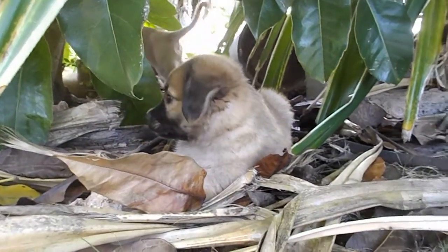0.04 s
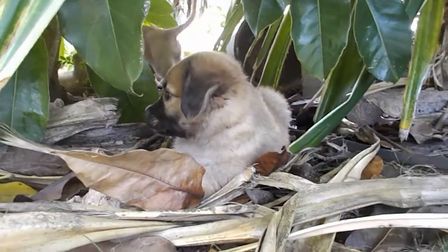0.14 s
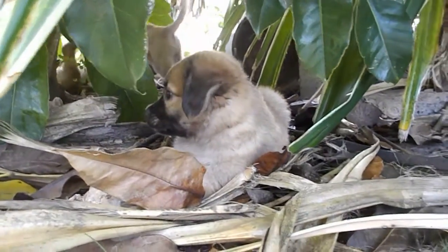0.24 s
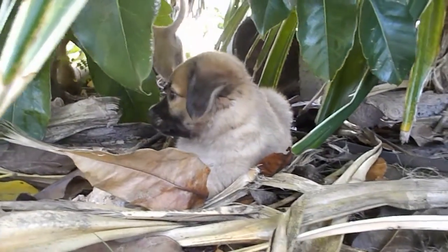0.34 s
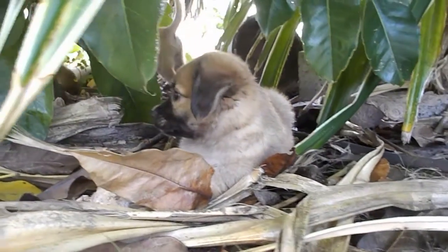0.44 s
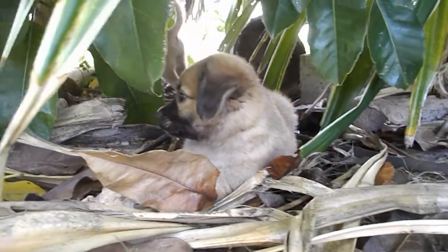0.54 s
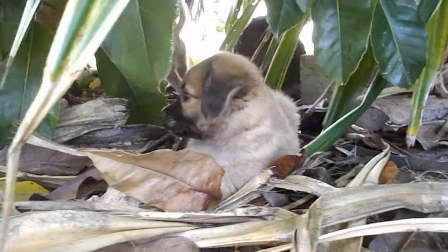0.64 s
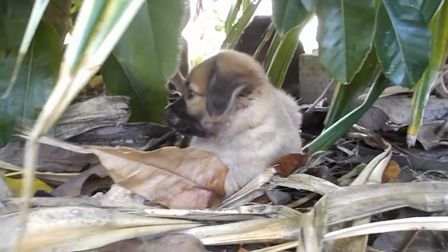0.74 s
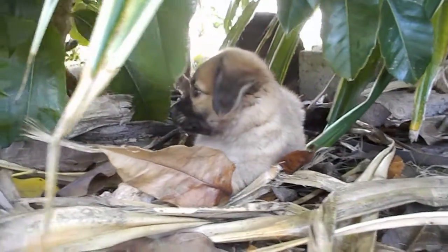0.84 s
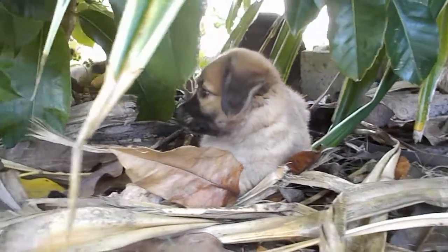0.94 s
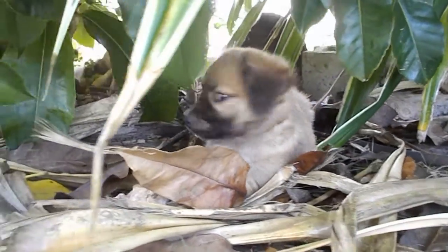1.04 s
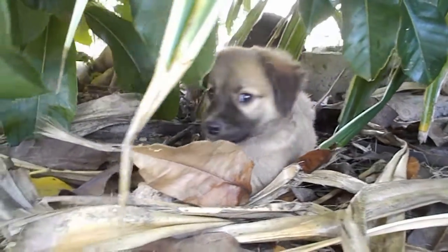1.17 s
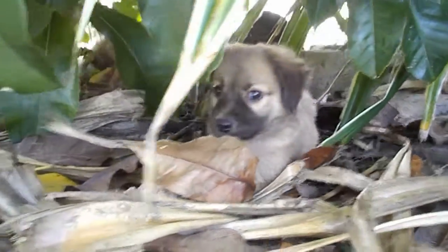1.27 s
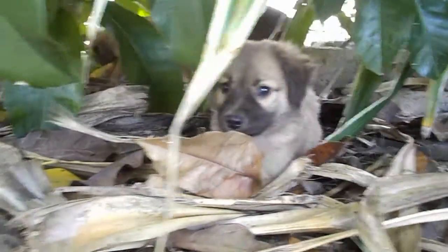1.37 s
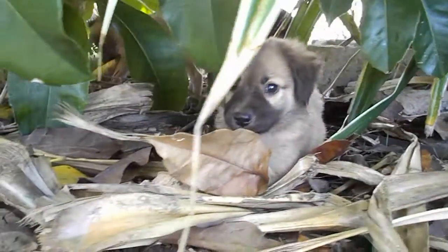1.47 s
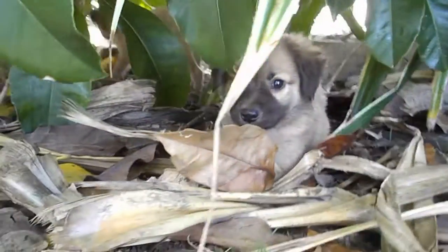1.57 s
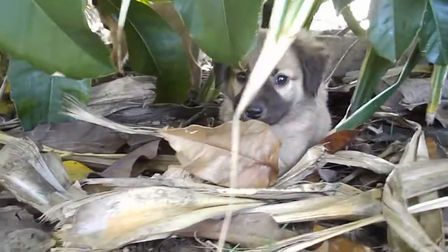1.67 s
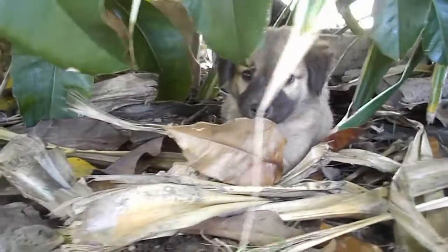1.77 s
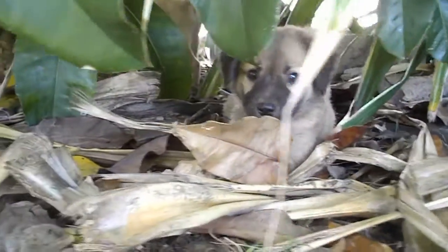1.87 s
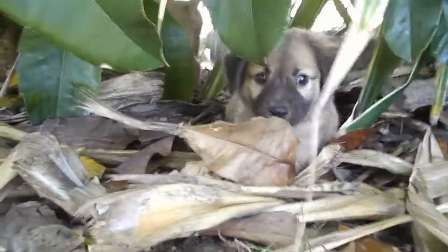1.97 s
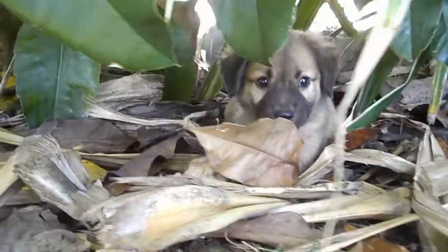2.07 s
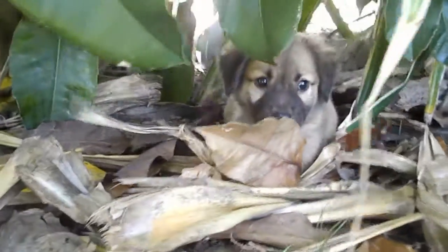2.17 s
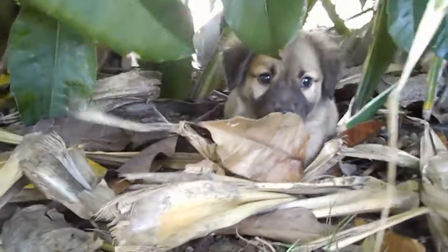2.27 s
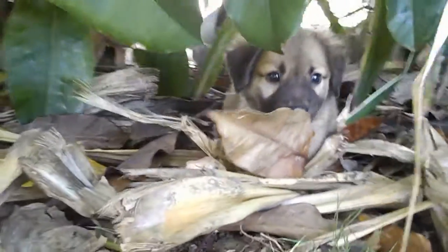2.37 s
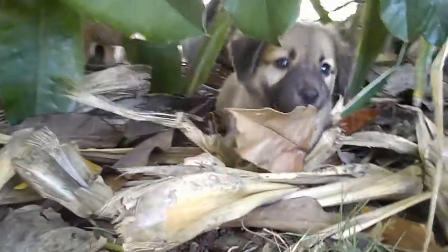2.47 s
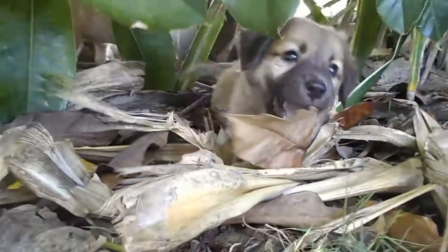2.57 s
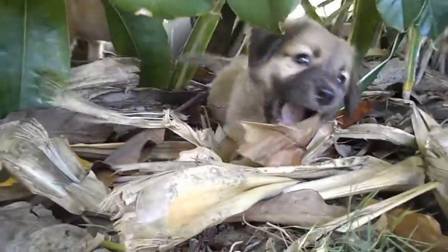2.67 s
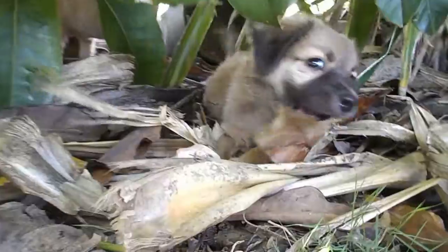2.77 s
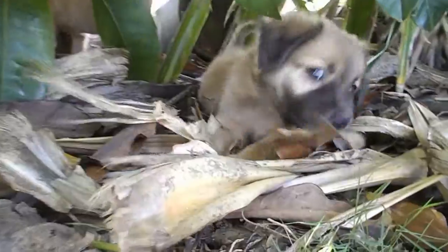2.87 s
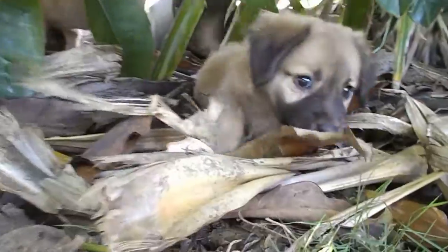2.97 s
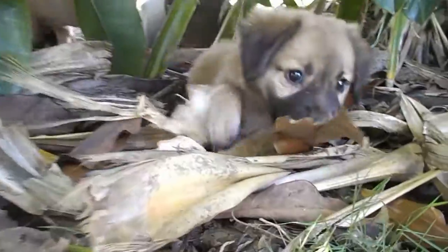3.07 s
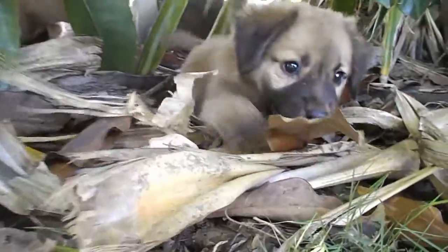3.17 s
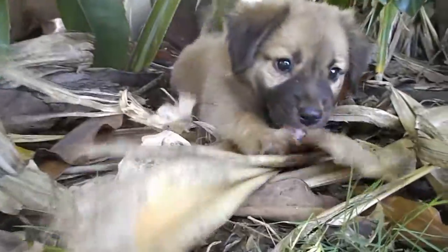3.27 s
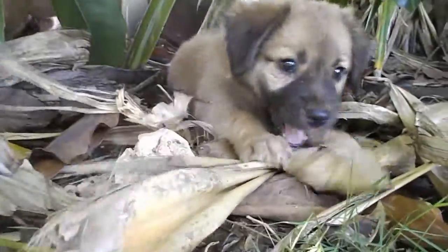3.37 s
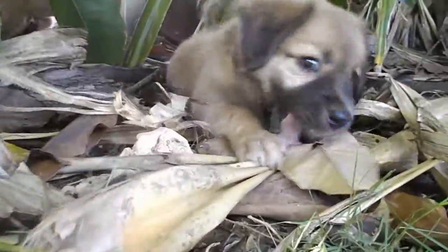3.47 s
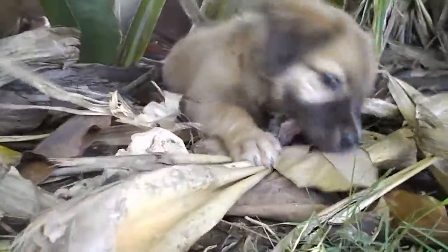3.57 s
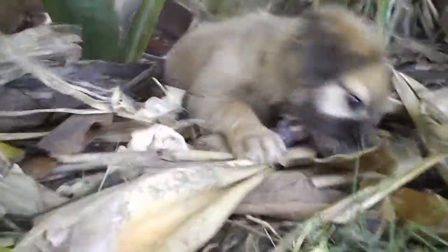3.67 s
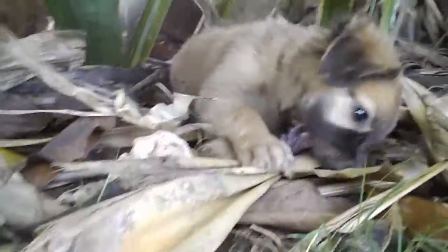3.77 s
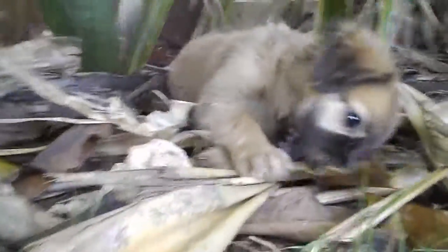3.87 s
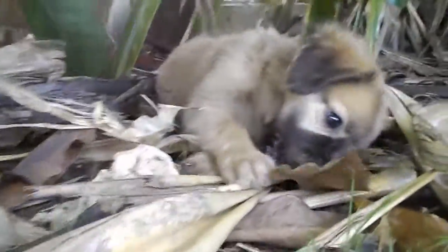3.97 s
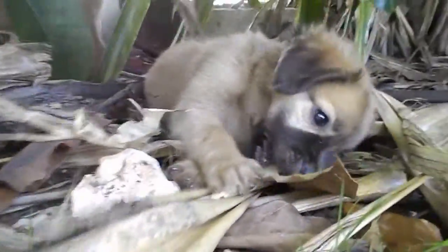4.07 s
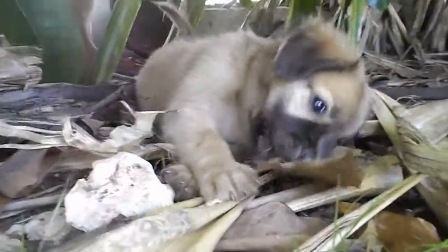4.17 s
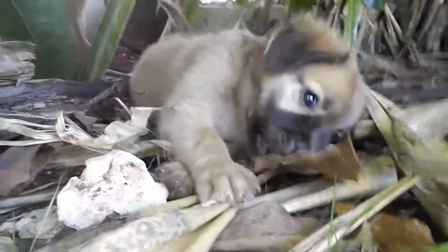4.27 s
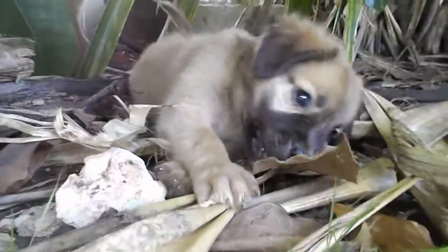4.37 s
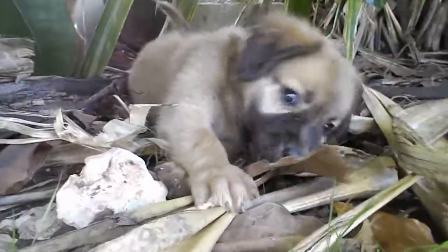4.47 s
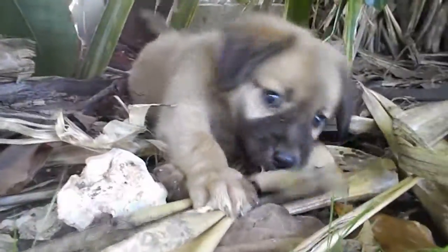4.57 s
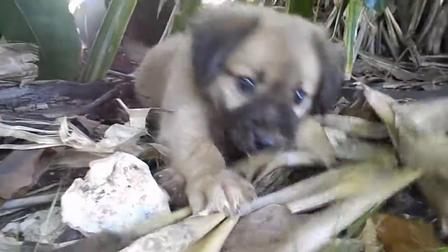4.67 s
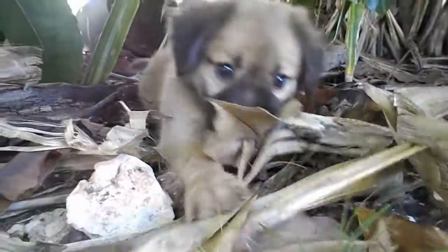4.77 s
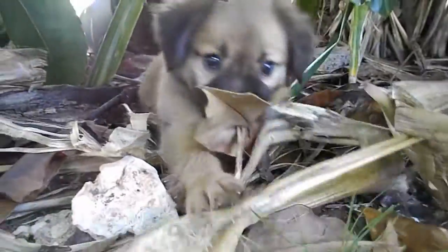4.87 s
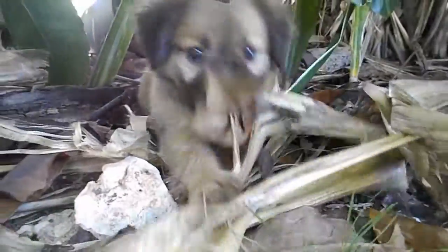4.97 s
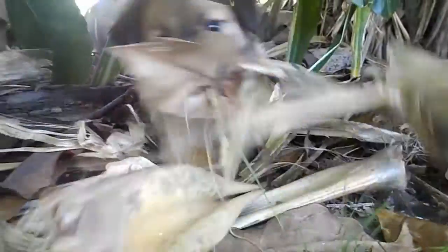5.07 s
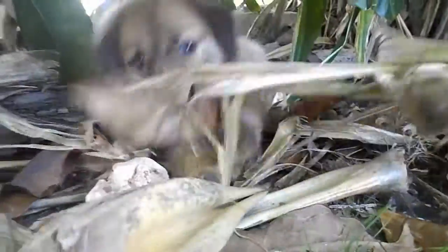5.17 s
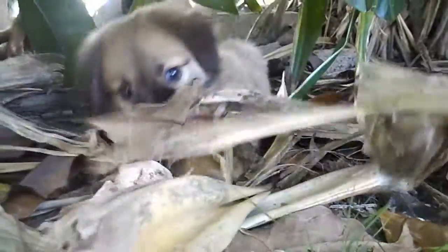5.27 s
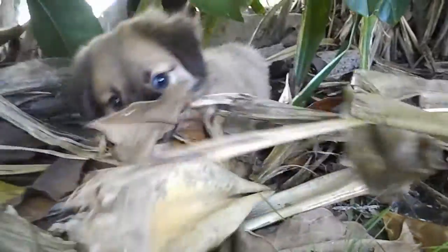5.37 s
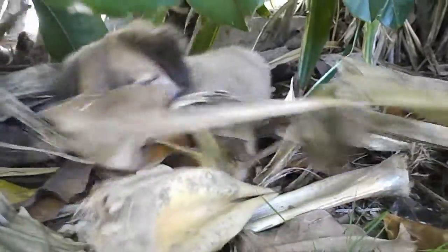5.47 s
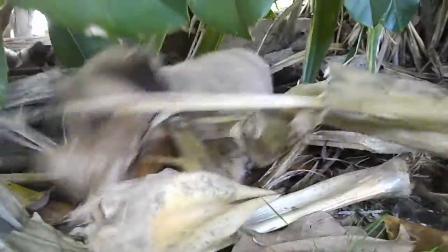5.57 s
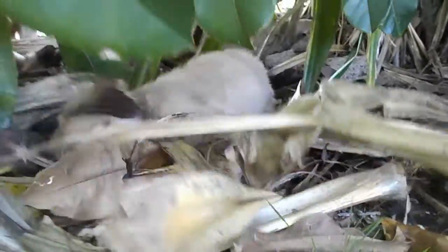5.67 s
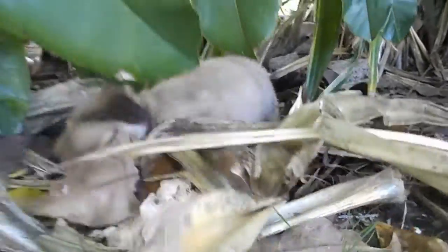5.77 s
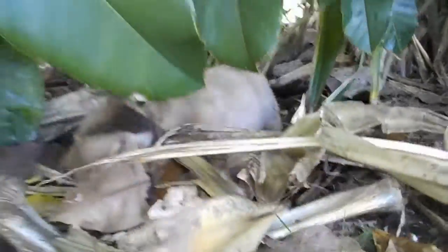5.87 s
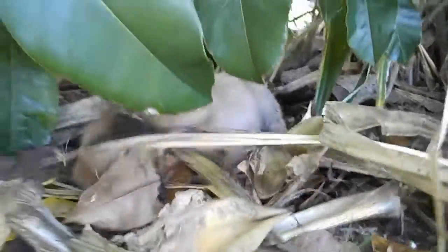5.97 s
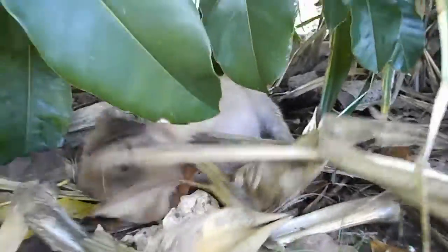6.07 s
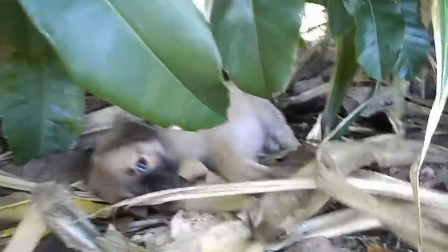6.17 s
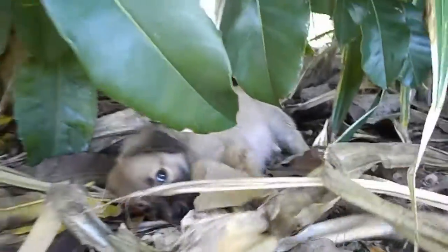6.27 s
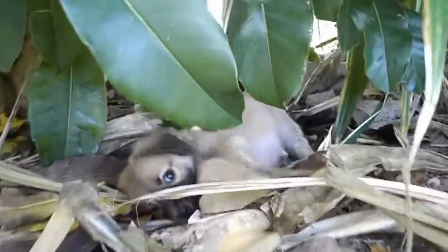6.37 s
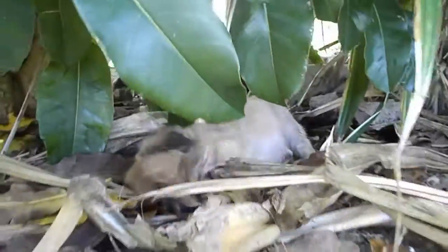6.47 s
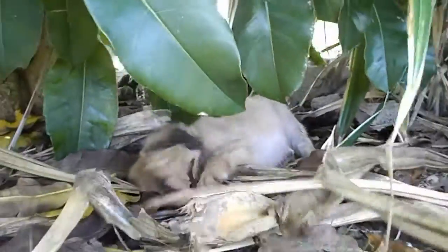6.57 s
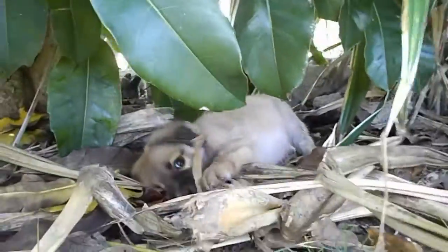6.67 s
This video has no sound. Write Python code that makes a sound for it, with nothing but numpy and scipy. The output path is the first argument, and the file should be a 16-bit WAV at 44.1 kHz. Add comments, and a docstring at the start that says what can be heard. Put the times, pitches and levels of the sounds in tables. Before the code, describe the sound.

Close mono pickup outdoors on leafy ground. Near silence with isolated crisp ticks, then brief faint rustles as a puppy stirs. Midway, strong papery crunches begin, followed by rapid brittle snapping with small hollow knocks as leaves are bitten and pawed. A loud, splintering tug leads into dense dragging rustle in uneven surges, which finally thins out. A low, distant, airy hush stays underneath, with no noticeable room echo.

```python
"""Dry leaves rustle, crunch and snap close by as a puppy paws, chews and drags them on garden ground.
Sliding leaves are noise shaped by thousands of tiny fractures and slips, with ticks on top.
Ribs snap one by one as short noise bursts; scuffs, clicks and low thumps are noise in two resonances.
A short spray of echoes from litter and plants blurs the rustle, over a faint outdoor hush."""
import sys
import numpy as np
from scipy import signal
from scipy.io import wavfile
from scipy.ndimage import uniform_filter1d

SR = 44100
rng = np.random.default_rng(int(sys.argv[2]) if len(sys.argv) > 2 else 0)


def file_out(sig):
    """Save sig as 16-bit WAV at sys.argv[1]."""
    # one column per channel
    cols = np.atleast_2d(sig).T
    # limit, then scale
    lim = np.clip(cols, -1, 1)
    pcm = np.round(lim * 32767).astype(np.int16)
    wavfile.write(sys.argv[1], SR, pcm)


N = 296391
CUTOFF_HZ = 15800  # top of the splintering and of the microphone


def rustle():
    """Thin blades crackle and tick brightly; the packed litter under them crunches and taps lower down."""
    # how strong each pitch is in the loose blades: (frequency [Hz], level [dB])
    crisp_colour = [(1000, -8), (1800, -3), (3500, 2), (6500, 2), (10000, 2), (13000, 1), (16000, 5)]
    # how strong each pitch is in the packed litter: (frequency [Hz], level [dB])
    dull_colour = [(100, -55), (250, -14.5), (500, -1), (850, 4), (1500, -4), (2500, 2)]
    # the packed litter yields less, so its level follows only a share of the effort's swing in dB
    reference_db, litter_db, litter_follows = -35, -50, 0.64
    # leaves catch and let go, so the level wavers
    uneven_db, uneven_per_s = 1.32, 28

    effort = effort_db()
    crisp_db = effort + uneven_db * drift(uneven_per_s)
    dull_db = litter_db + litter_follows * (effort - reference_db)
    dull_db += uneven_db * drift(uneven_per_s)

    crisp = crackle(crisp_colour, per_s=1500, size_db=3.0, clump_db=1.7, colour_db=3,
                    friction_db=1, burst_s=0.0004, count=14)
    crisp += ticks(1500, 6000, per_s=60, level_db=9, spread_db=7)
    dull = crackle(dull_colour, per_s=400, size_db=5.0, clump_db=0.5, colour_db=4.5,
                   friction_db=-2.5, burst_s=0.00051, count=8)
    dull += ticks(400, 900, per_s=12, level_db=12, spread_db=7)
    return from_db(crisp_db) * crisp + from_db(dull_db) * dull


def effort_db():
    """How hard the leaves are moved: each push swells and dies away on top of the slowly changing stirring."""
    # pushes of paw or muzzle that slide leaves over each other: (time of the peak [s], length [s], level [dB])
    strokes = [(0.044, 0.12, -60), (0.233, .04, -59), (0.509, .04, -58), (1.2, .06, -57.5),
               (1.411, .035, -46.5), (1.76, 0.09, -58), (1.86, 0.068, -57.5), (2.13, 0.061, -46.5),
               (2.243, 0.11, -43), (2.452, 0.024, -47), (2.667, 0.067, -46.5), (3.055, 0.12, -51.5),
               (3.363, 0.054, -29.5), (3.485, 0.11, -29), (3.587, 0.045, -38.5), (3.763, 0.16, -37),
               (4.171, 0.068, -31.5), (4.281, 0.13, -33.5), (4.558, 0.11, -38.5), (4.772, 0.13, -30.5),
               (4.86, 0.077, -27.5), (5.118, 0.089, -31), (5.261, 0.043, -38), (5.543, 0.12, -35),
               (5.746, 0.32, -34.5), (5.91, 0.042, -36), (6.071, 0.099, -33), (6.194, 0.055, -29),
               (6.281, 0.16, -30), (6.65, 0.1, -39.5)]
    # rising and dipping stirring of the litter under the puppy's body, which grows louder overall
    # as it comes near: (time [s], level [dB])
    stirring = [(0, -67.5), (1.1, -65), (1.5, -57.5), (1.65, -61), (2.05, -65.5), (2.3, -53), (2.41, -62.5),
                (2.52, -55), (2.85, -56.5), (3.27, -51.5), (3.65, -47), (3.85, -43), (4.45, -46.5),
                (4.63, -44.5), (5.05, -33.5), (5.75, -38.5), (6.4, -42), (6.72, -49.5)]
    swell_share = 0.5  # part of a push spent swelling; the rest is its release

    t = np.arange(N) / SR
    power = from_db(np.interp(t, *np.transpose(stirring))) ** 2
    for peak_s, length, level_db in strokes:
        width = length * np.where(t < peak_s, swell_share, 1 - swell_share)
        power += from_db(level_db) ** 2 * np.exp(-2 * np.minimum(((t - peak_s) / width) ** 2, 20))
    return 10 * np.log10(power)


def crackle(spectrum, per_s, size_db, clump_db, colour_db, friction_db, burst_s, count):
    """Clumps of tiny fractures, each with a colour of its own, over the hiss of sliding; rms near 1."""
    born = rng.random(N) < per_s / SR
    clumps = from_db(clump_db * drift(160))
    # many small fractures and a few large ones
    sizes = born * from_db(size_db * np.minimum(rng.exponential(1, N), 4))
    fade = np.exp(-2 / (burst_s * SR))
    out = np.zeros(N)
    for low, high, gain in bands_of(spectrum, count):
        # a fracture is a burst of slips that lasts a fraction of a millisecond
        colour = from_db(colour_db * (2 * rng.random(N) - 1))
        energy = signal.lfilter([1], [1, -fade], (sizes * colour) ** 2 + 1e-18)
        loudness = np.sqrt(energy / energy.mean() + from_db(friction_db) ** 2)
        drive = clumps * loudness * rng.standard_normal(N)
        # the leaves in contact keep changing, and with them the strongest resonances
        shifting = from_db(1.4 * drift(45))
        out += gain * shifting * band(scatter(drive, t60=0.05, wet_db=-2.5), low, high)
    # even out the level: the pressure of the paw, not the chance of the fractures, sets the loudness
    recent_power = uniform_filter1d(out ** 2, size=1500)
    return out / np.sqrt(recent_power + 1e-12)


def ticks(lowest_hz, highest_hz, per_s, level_db, spread_db):
    """Many times a second a brittle edge flakes off with a tick that adds to the crackle."""
    out = np.zeros(N + SR)
    for when, size, pitch in rng.random((int(per_s * N / SR), 3)):
        low_hz = lowest_hz * (highest_hz / lowest_hz) ** pitch
        tick = fracture(low_hz, 4 * low_hz, 0.0008, tail_db=-2, tail_t60=0.03)
        start = int(when * N)
        out[start:start + len(tick)] += from_db(level_db - spread_db * size) * tick
    return out[:N]


def scatter(x, t60, wet_db):
    """Leaves and stems nearby answer every click with a short, dense spray of random echoes."""
    keep = from_db(-120 / (t60 * SR))  # share of the energy left after one sample
    energy = signal.lfilter([1 - keep], [1, -keep], x ** 2 + 1e-18)
    return x + from_db(wet_db) * np.sqrt(energy) * rng.standard_normal(len(x))


def snaps():
    """Each snap of a leaf rib has a sharp crack, a finer splintering and the slower knock of the hollow leaf."""
    # ribs snapping, from faint ticks to loud cracks, each level being the energy as the rms of one millisecond:
    # (time [s], length of the break [s], crack [dB], splintering [dB], hollow knock [dB])
    rib_snaps = [(0.3984, 0.00062, -35, -37.5, -65), (1.3357, 0.0013, -25, -24, -38),
                 (1.535, .003, -39.5, -47, -44.5), (2.2372, 0.0083, -27.5, -45, -36.5),
                 (2.2644, .002, -27.5, -36, -33.5), (2.4358, 0.016, -35.5, -31, -56),
                 (3.204, 0.0018, -42, -38, -64), (3.4, .0008, -35, -29, -50),
                 (3.564, 0.0075, -22.5, -29, -39), (3.684, 0.0007, -27.5, -44, -41),
                 (3.6933, 0.0035, -25, -26, -34.5), (3.707, 0.0023, -23, -21.5, -32.5),
                 (3.7386, 0.00055, -22.5, -22, -33), (3.7457, 0.0015, -21, -14, -35.5),
                 (3.7733, 0.0059, -20, -22, -31), (3.7908, 0.0011, -22, -14, -27),
                 (3.8674, 0.0015, -19.5, -17.5, -25.5), (3.9657, .0008, -29, -33, -50),
                 (4.0064, .001, -35, -25, -28), (4.0293, 0.0013, -20.5, -16.5, -22),
                 (4.074, 0.001, -26.5, -40, -29), (4.1652, 0.0051, -20.5, -24, -27),
                 (4.2012, 0.0053, -26, -31, -25.5), (4.215, .001, -26.5, -17.5, -39),
                 (4.2529, 0.001, -23.5, -18.5, -32.5), (4.34, 0.0036, -23.5, -23.5, -34.5),
                 (4.3877, 0.00098, -30, -28, -30.5), (4.5778, 0.00037, -20.5, -24.5, -34),
                 (4.6505, 0.0031, -28.5, -39, -32.5), (4.811, 0.0023, -22, -21, -30),
                 (4.847, 0.007, -29, -24, -26.5), (4.9703, 0.0056, -28, -17.5, -41),
                 (4.999, 0.0015, -24, -9.5, -47), (5.008, 0.00046, -15, -14, -42),
                 (5.13, .004, -30, -17, -39), (5.166, .0005, -41, -21.5, -48),
                 (5.274, 0.0025, -29, -20.5, -39), (5.4704, 0.0011, -16, -17, -27),
                 (5.5071, 0.0046, -22.5, -20, -27), (5.769, .001, -29, -22, -35),
                 (6.1916, .002, -30, -22.5, -30.5), (6.6033, 0.0087, -27, -27.5, -31.5),
                 (6.6862, 0.0096, -26, -27, -42)]
    # a heavier knock moves a larger piece of leaf, which sounds lower: (knock level [dB], pitch [Hz])
    knock_pitch = [(-35, 1050), (-28, 930), (-22, 680)]

    out = np.zeros(N + SR)
    for time_s, length, crack_db, splinter_db, knock_db in rib_snaps:
        knock_hz = np.interp(knock_db, *np.transpose(knock_pitch))
        crack = fracture(2260, 8550, length, tail_db=6.0, tail_t60=0.05)
        splinter = fracture(7700, CUTOFF_HZ, length, tail_db=-2, tail_t60=0.057)
        knock = fracture(0.61 * knock_hz, 1.71 * knock_hz, length + 0.00069, tail_db=-2.5, tail_t60=0.039)
        snap = from_db(crack_db) * crack + from_db(splinter_db) * splinter + from_db(knock_db) * knock
        start = int(time_s * SR)
        out[start:start + len(snap)] += snap
    return out[:N]


def fracture(low_hz, high_hz, length, tail_db, tail_t60, ragged_db=1.5):
    """A rib gives way at once and tears on in ragged slips, then the leaf rings out; energy of 1 ms at rms 1."""
    t = np.arange(SR // 10) / SR
    # a new random slip strength every half millisecond
    slips = from_db(ragged_db * np.repeat(rng.standard_normal(len(t)), SR // 2000)[:len(t)])
    attack = 1 - np.exp(-(t / 0.0001) ** 2)
    burst = slips * attack * np.exp(-(t / length) ** 2)
    # the ringing builds up during the break, then falls by 60 dB in tail_t60 seconds
    tail = from_db(tail_db - 60 * t / tail_t60) * np.minimum(t / length, 1)
    tail *= np.sqrt(length / tail_t60)
    x = band(rng.standard_normal(len(t)) * np.hypot(burst, tail), low_hz, high_hz, order=3)
    return x * np.sqrt(SR / 1000 / np.sum(x ** 2))


def scuffs(width=0.14, grain_db=3, overtone=1.96, overtone_db=-7):
    """Grainy friction swells and fades in a broad resonance and a weaker one about an octave above."""
    # scuffs, short clicks and dull low thumps, each with its own resonance:
    # (time of the middle [s], length [s], resonance [Hz], level [dB])
    scuffs_and_thumps = [(2.378, 0.025, 2540, -55.5), (2.58, 0.019, 2380, -53), (2.635, 0.021, 3280, -43.5),
                         (2.758, 0.013, 3480, -46), (2.88, .016, 3180, -48.5), (2.919, 0.016, 3900, -48),
                         (3.589, .017, 6000, -42), (4.342, 0.0053, 6250, -24.5), (5.003, 0.0032, 4060, -25),
                         (5.344, 0.024, 617, -45), (6.28, 0.016, 5750, -33), (6.35, 0.037, 870, -44)]

    t = np.arange(N) / SR
    out = np.zeros(N)
    friction = from_db(grain_db * drift(460)) * rng.standard_normal(N)
    for middle_s, length, hz, level_db in scuffs_and_thumps:
        stroke = np.exp(-np.minimum((2 * (t - middle_s) / length) ** 2, 20))
        low_ring = rms_one(band(friction, hz * (1 - width), hz * (1 + width)))
        high_hz = overtone * hz
        high_ring = rms_one(band(friction, high_hz * (1 - width), high_hz * (1 + width)))
        out += from_db(level_db) * stroke * (low_ring + from_db(overtone_db) * high_ring)
    return out


def hush():
    """Steady far-off outdoor noise with a thin hiss on top: random noise, weighted band by band."""
    # how strong each pitch is, before the whole is set to its level: (frequency [Hz], level [dB])
    hush_colour = [(15, -58), (25, -30.5), (169, -6.5), (457, 0.5), (552, -0.5), (848, -3.5), (919, 0),
                   (1570, -7.5), (1710, -8.5), (15500, -19)]
    air = np.zeros(N)
    for low, high, gain in bands_of(hush_colour, count=20):
        air += gain * band(rng.standard_normal(N), low, high)
    return from_db(-62) * rms_one(air)


def drift(rate):
    """Smooth chance with an rms of 1, changing about rate times a second."""
    knots = rng.standard_normal(4096)
    return rms_one(np.interp(np.arange(N) / SR * rate, np.arange(len(knots)), knots))


def bands_of(spectrum, count):
    """Split the range of a spectrum into bands: (low Hz, high Hz, gain)."""
    edges = np.geomspace(spectrum[0][0], spectrum[-1][0], count + 1)
    return [(low, high, from_db(at_hz(spectrum, np.sqrt(low * high))))
            for low, high in zip(edges, edges[1:])]


def at_hz(points, hz):
    """Read the level of a spectrum, with pitch spaced evenly by octaves."""
    point_hz, point_db = np.transpose(points)
    return np.interp(np.log(hz), np.log(point_hz), point_db)


def band(x, low, high, order=2):
    """Keep mainly the frequencies from low to high, in Hz."""
    sections = signal.butter(order, [low, min(high, 0.45 * SR)], "band", fs=SR, output="sos")
    return signal.sosfilt(sections, x + 1e-18)


def rms_one(x):
    """Scale to an rms (average strength) of 1."""
    return x / np.sqrt(np.mean(x ** 2) + 1e-20)


def from_db(db):
    """Turn decibels into a gain."""
    return 10 ** (np.asarray(db) / 20)


def scene():
    """Add up all the sounds; one microphone feeds both channels."""
    mono = rustle() + snaps() + scuffs() + hush()
    return np.tile(mono, (2, 1))


def record(dry):
    """The microphone has a narrow notch in the treble; the top is cut steeply."""
    notch_hz, notch_q = 8620, 19  # a higher q makes a narrower notch
    notched = signal.lfilter(*signal.iirnotch(notch_hz, notch_q, fs=SR), dry)
    # 0.2 dB of ripple below the cutoff, 80 dB of damping above
    steep_cut = signal.ellip(10, 0.2, 80, CUTOFF_HZ, fs=SR, output="sos")
    return signal.sosfilt(steep_cut, notched)


dry = scene()
out = record(dry)
file_out(out)
```